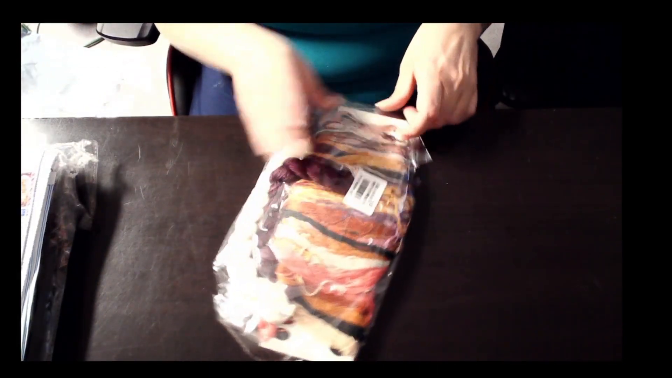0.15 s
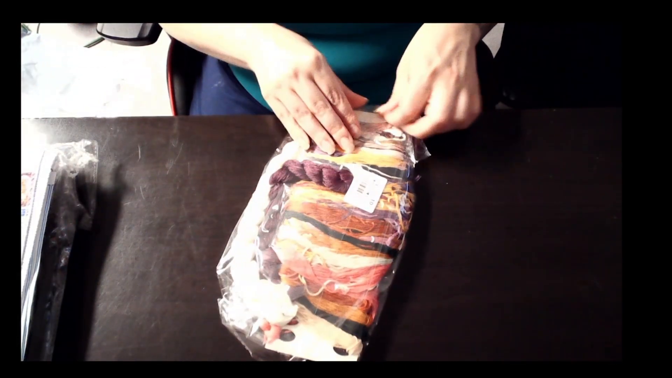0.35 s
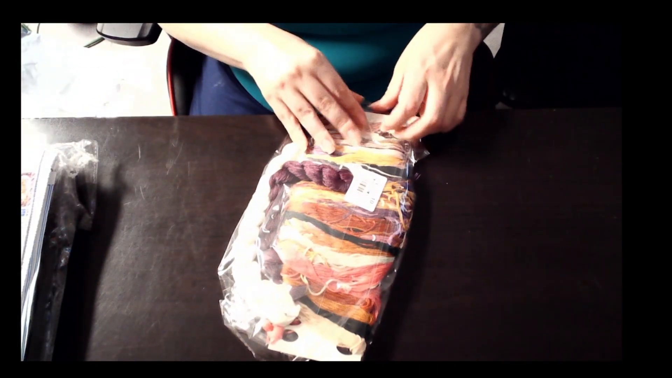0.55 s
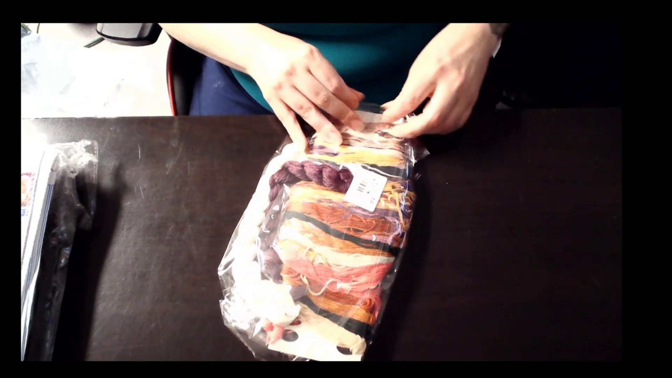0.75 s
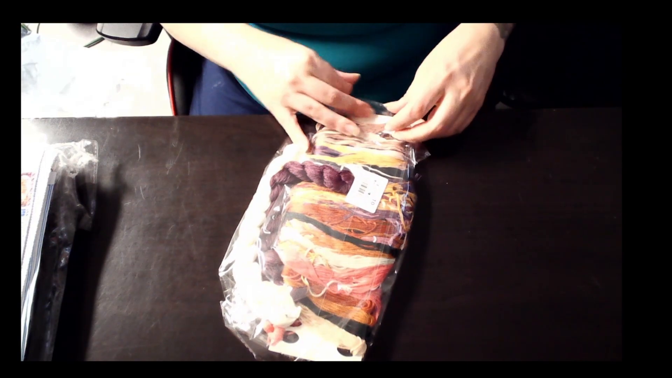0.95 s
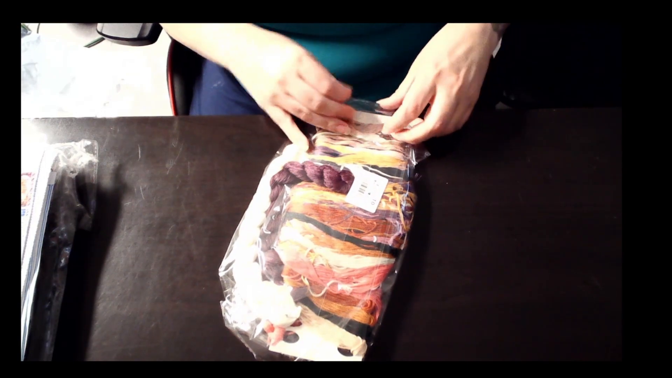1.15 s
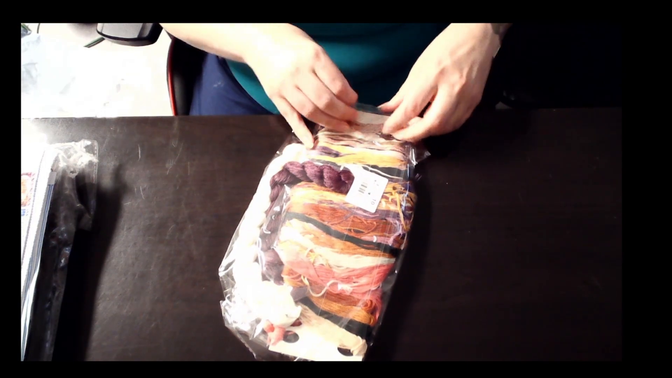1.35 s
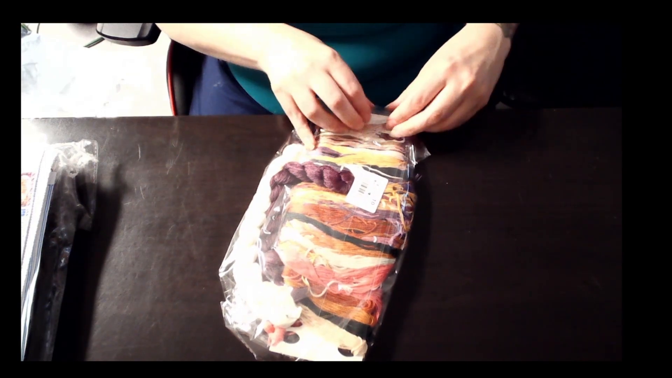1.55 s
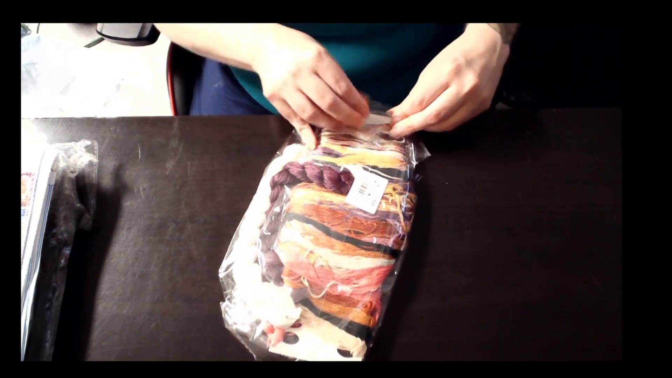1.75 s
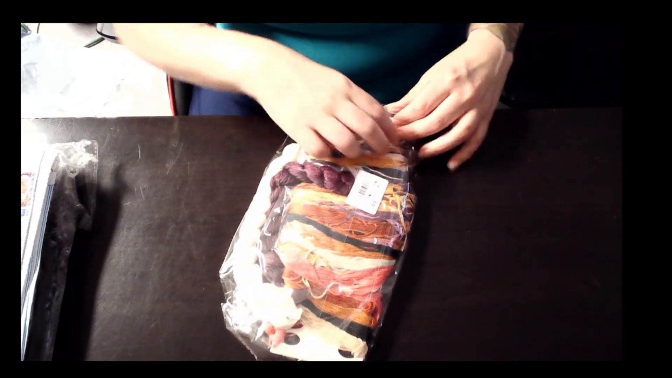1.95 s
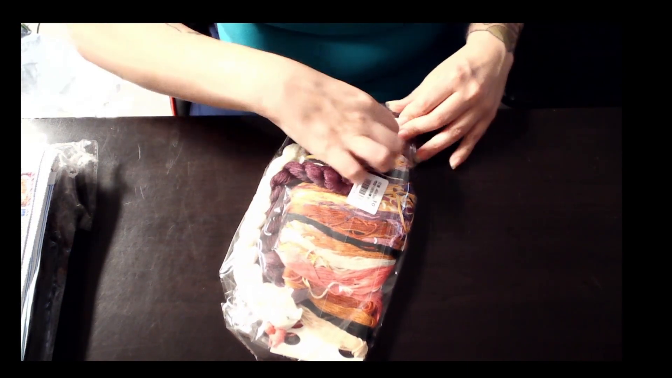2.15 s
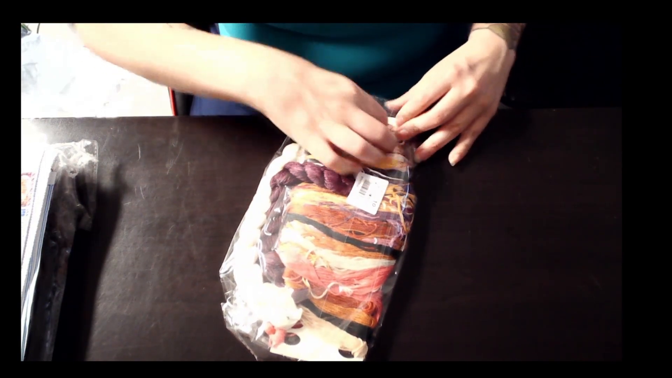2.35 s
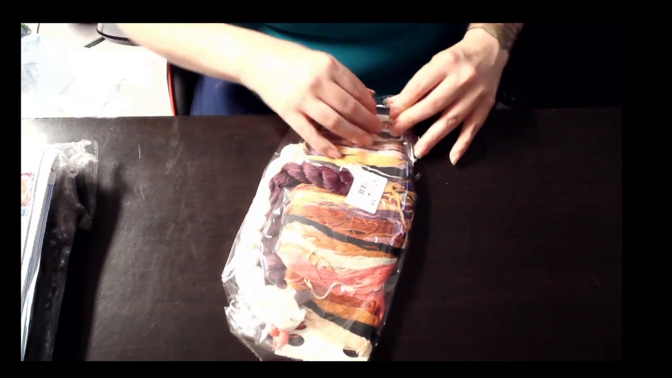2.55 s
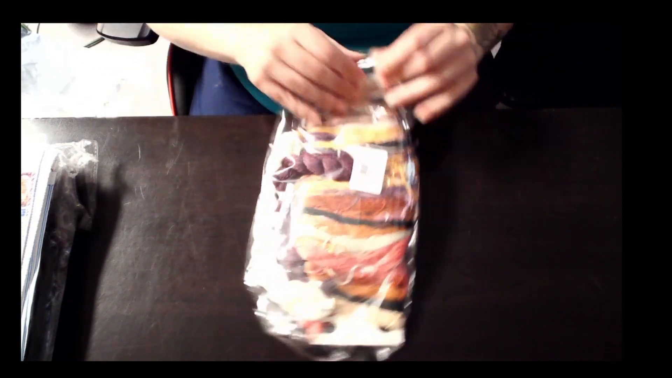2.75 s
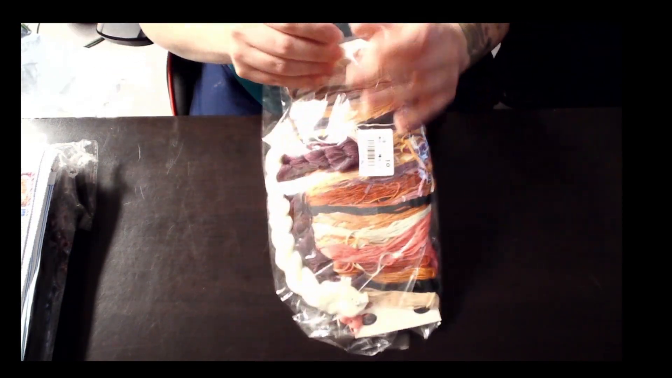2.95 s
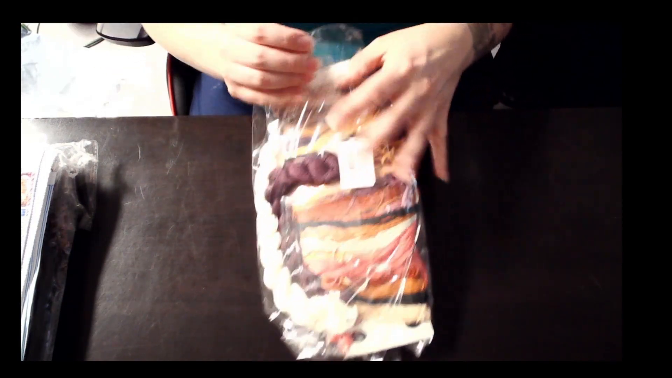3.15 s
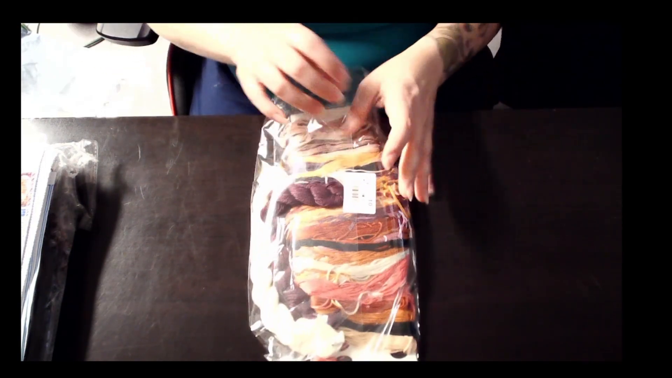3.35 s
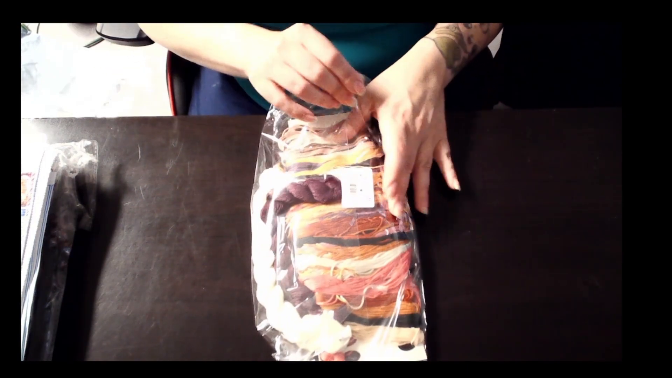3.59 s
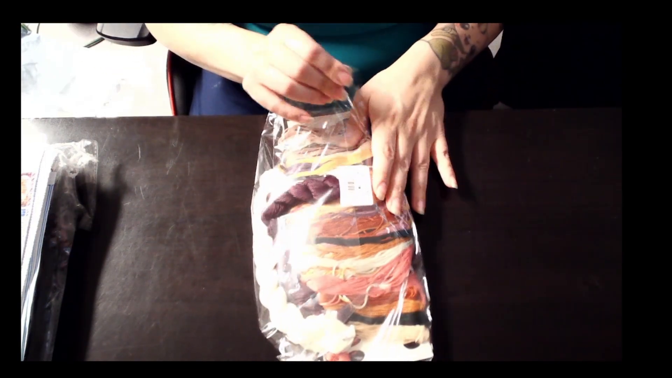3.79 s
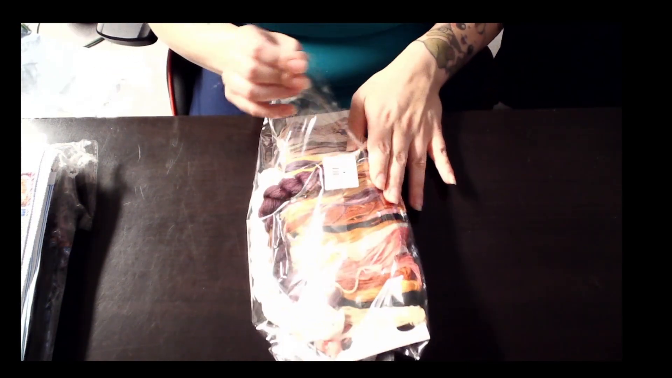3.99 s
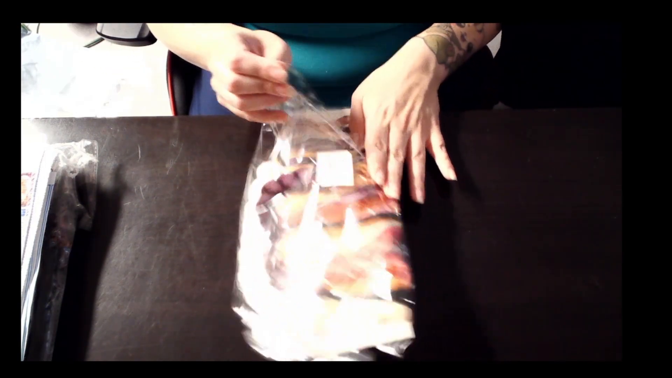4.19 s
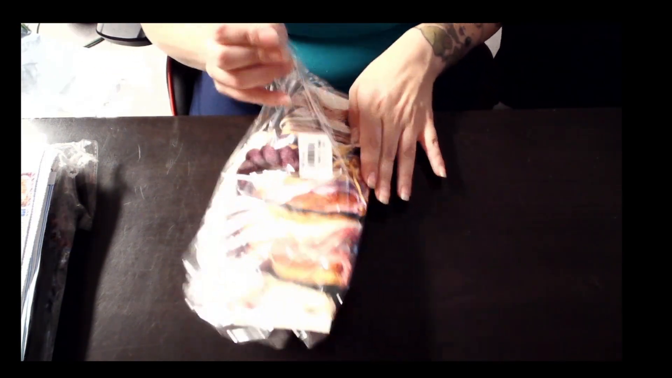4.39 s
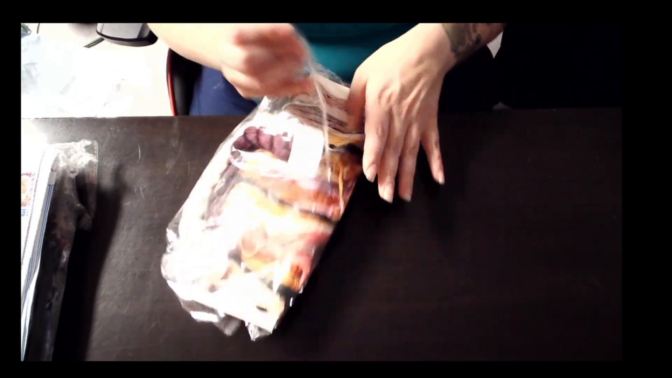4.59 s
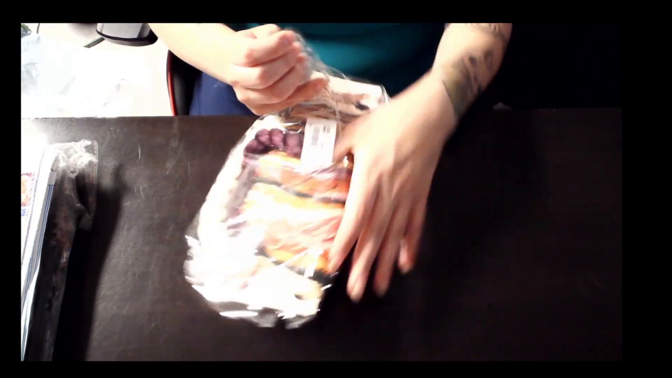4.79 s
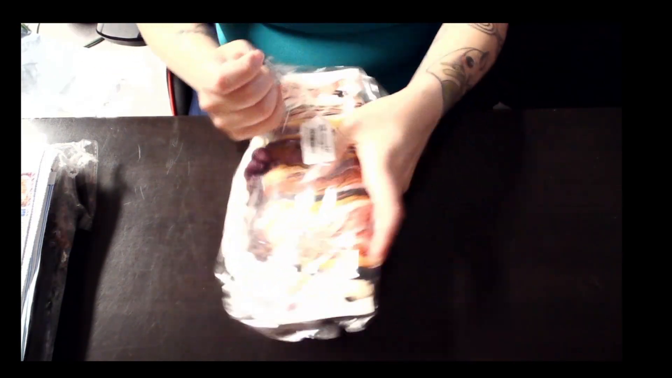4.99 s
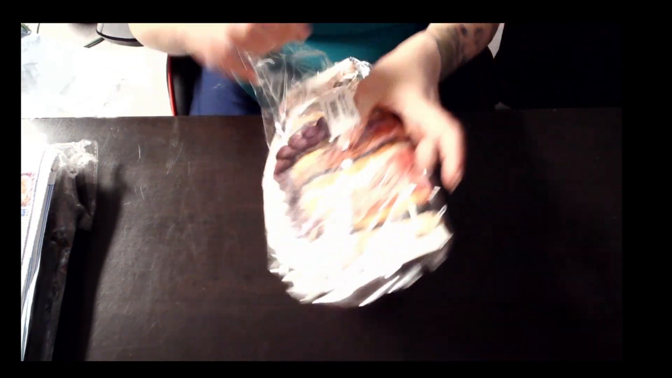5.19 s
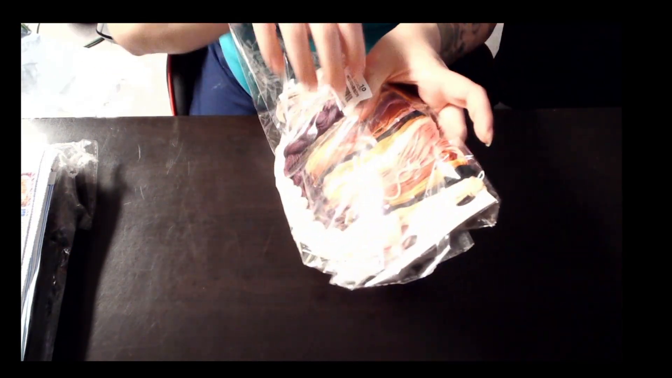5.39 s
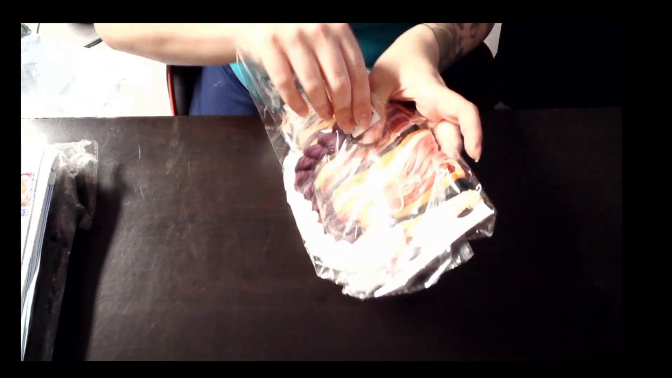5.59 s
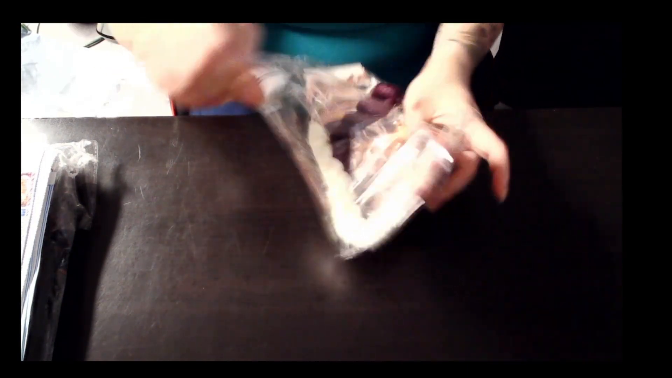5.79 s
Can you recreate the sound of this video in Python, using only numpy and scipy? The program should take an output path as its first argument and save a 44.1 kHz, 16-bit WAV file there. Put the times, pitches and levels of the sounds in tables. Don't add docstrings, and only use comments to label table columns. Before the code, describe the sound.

Thin clear plastic bag crinkles and snaps irregularly as hands knead, lift and turn it on a table, ending in a sharp loud burst.

```python
import sys
import numpy as np
from scipy import signal
from scipy.fft import rfft, irfft, next_fast_len
from scipy.io import wavfile
from scipy.ndimage import uniform_filter1d, minimum_filter1d, map_coordinates

SR = 44100
rng = np.random.default_rng(int(sys.argv[2]) if len(sys.argv) > 2 else 0)


def amp(db):
    return 10 ** (np.asarray(db, float) / 20)


def write(x):
    x = np.atleast_2d(x).T
    wavfile.write(sys.argv[1], SR, np.round(np.clip(x, -1, 1) * 32767).astype(np.int16))


N = 257367

# [f/Hz, density/dB per Hz]
AIR_COLOUR = [(15, -15.5), (60, 3), (200, -4), (500, -7), (1500, -2), (7000, -7.5)]
# [t/s, peak level/dB, crease pitch f/Hz]
CREASES = [(0.0043, -28.5, 7060), (0.0116, -34.5, 4130), (0.0308, -33.5, 6800), (0.0354, -37.5, 6720),
           (0.0619, -35.0, 5000), (0.0766, -41.0, 6370), (0.1082, -37.0, 3700), (0.1241, -37.0, 6030),
           (0.1544, -33.5, 3270), (0.2326, -46.0, 5860), (0.2395, -42.5, 6630), (0.2494, -40.5, 6200),
           (0.2607, -38.0, 3270), (0.2926, -45.0, 3530), (0.2998, -36.5, 6800), (0.3071, -41.0, 6890),
           (0.3174, -42.0, 6120), (0.3219, -41.5, 3620), (0.3382, -30.0, 3620), (0.3588, -39.5, 3010),
           (0.3662, -40.5, 6890), (0.3786, -38.0, 6370), (0.3886, -36.5, 6370), (0.399, -42.0, 5680),
           (0.4376, -33.0, 6030), (0.4707, -33.5, 6550), (0.4783, -32.0, 3360), (0.5114, -44.0, 3010),
           (0.5472, -34.0, 3360), (0.5542, -36.0, 5600), (0.5675, -42.0, 3270), (0.6077, -43.0, 5680),
           (0.6141, -33.0, 5510), (0.6879, -34.5, 6890), (0.7793, -37.0, 6030), (0.8003, -49.5, 6120),
           (0.8241, -52.0, 3190), (0.8366, -28.0, 3880), (0.8584, -36.5, 5250), (0.8722, -37.0, 6720),
           (0.8962, -35.5, 3530), (0.9394, -43.5, 5940), (0.9842, -44.5, 3620), (0.9897, -45.5, 3700),
           (0.9968, -42.5, 3270), (1.0117, -37.0, 3190), (1.0282, -44.5, 3450), (1.0329, -42.0, 3190),
           (1.0466, -40.5, 5510), (1.0792, -47.5, 6550), (1.0849, -43.0, 3530), (1.0939, -41.0, 3790),
           (1.1007, -42.5, 3100), (1.1219, -36.0, 5860), (1.1595, -39.0, 7060), (1.1984, -43.0, 4130),
           (1.216, -39.5, 3790), (1.2198, -40.5, 5860),
           (1.2282, -39.5, 5770), (1.2763, -42.0, 3450), (1.3222, -42.0, 3620), (1.3364, -40.5, 6720),
           (1.3453, -38.5, 6800), (1.4083, -37.5, 3790), (1.4121, -37.0, 6890), (1.4628, -41.0, 3700),
           (1.4815, -46.0, 3530), (1.5146, -37.0, 4740), (1.5323, -48.5, 5080), (1.5374, -41.0, 6290),
           (1.546, -40.5, 7060), (1.5833, -48.0, 3880), (1.6035, -30.5, 3700), (1.6268, -34.5, 3530),
           (1.6399, -40.5, 3620), (1.6738, -32.5, 3270), (1.6782, -36.0, 4740), (1.7022, -36.0, 4390),
           (1.7435, -49.0, 5430), (1.7529, -51.5, 4570), (1.7968, -48.0, 6290), (1.8646, -30.0, 6460),
           (1.8836, -40.0, 6550), (1.9028, -40.0, 6460), (1.9205, -43.5, 4740), (1.9902, -42.0, 3190),
           (2.0066, -41.0, 3530), (2.0183, -40.5, 3790), (2.0371, -41.5, 3270), (2.0515, -24.0, 6200),
           (2.0591, -37.5, 5680), (2.0836, -29.0, 3620), (2.11, -29.0, 4130), (2.1637, -38.0, 2840),
           (2.1801, -38.5, 3530), (2.1854, -44.5, 7060), (2.2211, -52.5, 4130), (2.2516, -44.5, 6370),
           (2.2963, -31.5, 6890), (2.3238, -34.5, 5600), (2.3782, -42.0, 6800), (2.4061, -41.0, 6720),
           (2.4329, -41.5, 6200), (2.4613, -34.5, 3960), (2.4654, -39.0, 3880), (2.4742, -40.5, 3530),
           (2.4859, -35.0, 6890), (2.5104, -36.5, 4220), (2.5196, -31.5, 3700), (2.538, -33.0, 4310),
           (2.5497, -42.5, 4570), (2.5886, -32.5, 6290), (2.6158, -43.0, 5080), (2.6461, -39.5, 6120),
           (2.6521, -36.0, 6120), (2.6721, -37.5, 6800),
           (2.7056, -31.5, 3960), (2.719, -25.5, 6550), (2.7341, -37.0, 4740), (2.746, -36.5, 6200),
           (2.7624, -34.5, 3360), (2.7835, -28.0, 6630), (2.8197, -42.0, 6720), (2.8431, -29.0, 3700),
           (2.8473, -35.0, 5250), (2.8611, -35.0, 5680), (2.8797, -28.0, 6980), (2.8841, -28.5, 3530),
           (2.8951, -32.5, 6290), (2.9072, -31.5, 5430), (2.9124, -37.5, 2410), (2.9301, -24.5, 5430),
           (2.9371, -33.5, 5080), (2.951, -20.0, 6980), (2.9622, -29.5, 5170), (2.9903, -28.0, 5250),
           (2.9953, -31.0, 4910), (3.0114, -26.5, 5250), (3.0183, -29.5, 6980), (3.0402, -32.0, 5000),
           (3.0553, -33.5, 6290), (3.096, -36.0, 6200), (3.1132, -40.5, 6980), (3.1328, -36.0, 7150),
           (3.1419, -38.5, 5680), (3.1697, -33.5, 6720), (3.1758, -39.5, 5170), (3.1869, -37.5, 6980),
           (3.1925, -38.5, 5940), (3.2081, -42.0, 6200), (3.2502, -38.0, 3960), (3.2948, -42.5, 3190),
           (3.3209, -37.5, 5250), (3.3252, -42.0, 5600), (3.3337, -41.0, 2930), (3.3429, -36.5, 4910),
           (3.3495, -37.5, 2930), (3.3624, -40.5, 5080), (3.3667, -34.5, 6800), (3.4519, -41.5, 2930),
           (3.4932, -44.5, 3360), (3.5047, -34.0, 6630), (3.512, -38.0, 3360), (3.5325, -38.5, 3790),
           (3.5693, -44.0, 4390), (3.579, -36.0, 3360), (3.5866, -40.5, 5080), (3.6022, -39.5, 3700),
           (3.6244, -37.0, 3450), (3.6592, -36.5, 6890), (3.676, -38.5, 3450), (3.6904, -36.0, 3530),
           (3.742, -38.0, 3100), (3.7511, -40.0, 3270),
           (3.7555, -37.0, 3190), (3.7747, -38.0, 3620), (3.7989, -50.0, 5680), (3.8242, -29.5, 6120),
           (3.8301, -32.5, 6630), (3.8727, -27.0, 5080), (3.9046, -36.5, 3190), (3.9099, -37.0, 6460),
           (3.9178, -39.5, 6800), (3.9229, -40.0, 6550), (3.9354, -42.0, 6720), (3.9586, -33.0, 6720),
           (3.9797, -40.0, 6800), (3.9838, -37.0, 6720), (4.0102, -26.5, 3360), (4.076, -34.0, 6200),
           (4.093, -41.5, 6980), (4.1247, -27.5, 5860), (4.132, -39.5, 6030), (4.1398, -39.5, 6800),
           (4.1596, -42.0, 7060), (4.1716, -40.0, 6370), (4.1903, -41.5, 5340), (4.2073, -40.0, 2670),
           (4.2291, -29.5, 5600), (4.2357, -28.0, 4910), (4.2445, -20.5, 6800), (4.2549, -24.0, 6980),
           (4.269, -19.0, 6200), (4.2786, -22.0, 6120), (4.3063, -28.5, 4650), (4.329, -24.0, 6980),
           (4.3452, -27.5, 5080), (4.3504, -21.5, 6890), (4.3568, -25.0, 6550), (4.3771, -31.0, 6550),
           (4.3808, -34.0, 6890), (4.4019, -24.5, 6800), (4.4153, -36.0, 6800), (4.4306, -23.5, 6120),
           (4.437, -33.5, 5680), (4.4564, -35.0, 5000), (4.4752, -34.5, 5170), (4.4958, -28.5, 5340),
           (4.5005, -36.0, 6120), (4.5308, -34.0, 5770), (4.5402, -28.5, 6980), (4.5561, -38.5, 6370),
           (4.5714, -28.5, 4910), (4.5832, -31.5, 5600), (4.5931, -31.0, 5940), (4.6039, -26.0, 5430),
           (4.6082, -24.0, 6980), (4.6153, -19.0, 6980), (4.6329, -28.5, 4740), (4.6445, -37.5, 4740),
           (4.6854, -30.5, 6720), (4.7378, -40.5, 5340),
           (4.7482, -22.5, 5000), (4.7596, -33.0, 6980), (4.7705, -35.0, 5600), (4.8016, -28.5, 3530),
           (4.8095, -25.5, 3620), (4.8292, -32.5, 3190), (4.8559, -29.5, 7060), (4.88, -28.5, 4650),
           (4.8897, -23.5, 6890), (4.9091, -38.0, 5000), (4.9351, -25.5, 6030), (4.95, -32.5, 6980),
           (4.9576, -29.5, 6890), (4.9619, -34.5, 3360), (4.9857, -25.5, 5170), (4.9954, -26.0, 5000),
           (5.012, -32.0, 6890), (5.0282, -27.0, 5860), (5.0477, -34.0, 5510), (5.0577, -31.5, 4740),
           (5.0624, -29.5, 6030), (5.0829, -39.0, 6890), (5.1067, -39.0, 5430), (5.1178, -34.5, 5080),
           (5.1427, -30.5, 6720), (5.1471, -23.5, 6890), (5.1566, -28.5, 5510), (5.1637, -33.5, 6030),
           (5.1735, -34.0, 6550), (5.239, -42.0, 4570), (5.243, -46.5, 5770), (5.2601, -38.5, 3620),
           (5.2746, -34.5, 4740), (5.3543, -48.0, 6550), (5.3607, -31.0, 6800), (5.377, -36.0, 3790),
           (5.4041, -37.0, 6800), (5.4406, -43.0, 6200), (5.4563, -33.0, 5430), (5.5155, -38.5, 6800),
           (5.5732, -39.0, 2500), (5.603, -32.0, 7060), (5.6107, -35.5, 5170), (5.6438, -27.5, 3100),
           (5.6577, -26.5, 6800), (5.6799, -24.5, 6550), (5.6848, -17.5, 6720), (5.6903, -13.0, 6800),
           (5.6963, -13.5, 6890), (5.7007, -15.0, 6800), (5.706, -12.5, 6550), (5.7312, -21.0, 3620),
           (5.7419, -17.0, 5940), (5.7527, -20.5, 3270), (5.7692, -23.0, 4650), (5.8034, -26.0, 6980),
           (5.8089, -29.0, 6120), (5.8185, -30.5, 3450)]
# [t/s, peak level/dB]
STRAYS = [(.1796, -44), (1.326, -46), (1.6001, -39), (2.0104, -44), (2.4584, -41), (2.6939, -38),
          (2.6983, -35), (2.7581, -33), (2.7752, -35), (2.8351, -39), (3.024, -32), (3.044, -32),
          (3.7014, -37), (3.8692, -29), (4.2634, -27), (4.2754, -26), (4.4495, -35), (4.498, -29),
          (4.5961, -31)]
# [peak t/s, rustle level/dB, rise/s, fall/s]
SQUEEZES = [(0.0, -51, .1, .22), (.34, -54, .15, .08), (0.52, -62, .15, .2), (0.844, -56, .015, .2),
            (0.92, -61, 0.11, .07), (1.12, -60.5, .25, .16), (1.328, -65, .02, .12), (1.499, -65, .15, .35),
            (1.89, -57, .04, .08), (2.06, -60, .11, .16), (2.169, -63, .1, .04), (2.307, -58, .07, .17),
            (2.54, -61.5, .13, .2), (2.721, -49, .18, .22), (2.99, -45, .14, .135), (3.24, -56, .12, .085),
            (3.368, -59.5, .15, .2), (3.51, -59, .05, .12), (3.681, -58, .3, .2), (3.836, -49, .02, .2),
            (4.02, -57.5, .2, .045), (4.28, -45, .11, .28), (4.62, -49, .11, .07), (4.768, -50.5, .05, .32),
            (5.02, -46, .09, .15), (5.17, -51.5, .14, .09), (5.27, -62.5, .2, .02), (5.38, -57.5, .03, .1),
            (5.65, -48, .13, 0.12), (5.7, -34, .035, .2)]
# [f/Hz, density/dB per Hz]
FILM_COLOUR = [(900, -54.5), (1800, -26), (2600, -8.5), (3500, -5), (5700, -1.5), (6900, 1), (7700, 0.5),
               (8700, -29)]
# [f/Hz, density/dB per Hz]
BAG_AIR_COLOUR = [(150, -33), (400, -16), (800, -15), (1400, -4), (2300, 1), (3500, -14.5)]
# [t/s, boom level/dB against the rustle]
FULLNESS = [(0, -19), (.9, -26.5), (1.05, -21.5), (1.5, -28), (2.2, -27.5), (2.7, -19), (3.4, -14),
            (3.7, -6.5), (4.1, -22.5), (4.3, -14.5), (4.9, -20.5), (5.4, -19), (5.6, -10), (5.72, -11),
            (5.84, -16)]
# [f/Hz, t60/s]
ROOM_DECAY = [(500, 0.13), (7000, 0.19)]
# [t/s, level/dB, pitch f/Hz]
POCKETS = [(0.261, -62.5, 1190), (0.479, -61.5, 1200), (0.495, -64, 1460), (0.688, -60, 1570),
           (0.91, -59.5, 1640), (1.013, -59, 2130), (1.033, -55.5, 1330), (1.053, -60, 1270),
           (1.12, -55.5, 1590), (1.222, -73, 1630), (1.277, -71, 2220), (1.41, -64, 1400),
           (1.675, -63.5, 1480), (1.932, -62.5, 2070), (2.048, -60, 1376), (2.11, -61, 1480),
           (2.163, -62, 1630), (2.408, -65, 1470), (2.511, -57.5, 2070), (2.528, -63, 2200),
           (2.707, -49, 1050), (2.836, -59, 1880), (2.884, -46, 640), (2.911, -51, 1900),
           (2.951, -43.5, 2050), (3.051, -50.5, 1940), (3.167, -54, 2020), (3.506, -56, 1400),
           (3.523, -58, 1590), (3.595, -53, 1370), (3.695, -50, 1420), (3.758, -57, 1500),
           (3.833, -45, 970), (4.007, -56.5, 2320), (4.258, -49.5, 1230), (4.289, -39.5, 540),
           (4.346, -58, 1980), (4.432, -60, 2180), (4.497, -58, 1700), (4.608, -41.5, 2380),
           (4.799, -44, 2230), (4.902, -55, 1900), (4.996, -46, 825), (5.062, -48.5, 2210),
           (5.148, -43.5, 2300), (5.26, -62, 2170), (5.274, -77, 2090), (5.362, -52.5, 520),
           (5.377, -52.5, 840), (5.456, -59.5, 2040), (5.574, -46, 562), (5.692, -40, 2200),
           (5.741, -52, 2110)]
# [middle t/s, first mode level/dB, second mode level/dB, thud level/dB, half length/s]
SLIDES = [(0.456, -82, -100, -105, 0.037), (0.687, -81.5, -110, -97, 0.038),
          (0.892, -86, -110, -110, 0.076), (1.106, -76.5, -110, -104, 0.051), (1.491, -76, -91, -89, 0.022),
          (1.967, -92, -110, -93, 0.048), (2.206, -76, -108, -89, 0.075), (2.296, -93, -104, -97, 0.062),
          (2.48, -89.5, -108, -102, 0.19), (2.825, -100, -78.5, -106, 0.2), (2.943, -65.5, -87, -89, 0.16),
          (3.274, -78, -100, -82.5, 0.08), (3.63, -77, -99, -84, 0.023), (3.696, -79.5, -104, -100, 0.063),
          (3.936, -107, -112, -99, 0.12), (4.32, -80.5, -93, -85, 0.11), (4.627, -97, -76.5, -99, 0.059),
          (4.733, -69.5, -104, -85, 0.15), (4.992, -68, -90, -88, 0.042), (5.085, -72.5, -73, -80.5, 0.12),
          (5.244, -74, -80, -102, 0.021), (5.363, -82, -86, -81.5, 0.03), (5.595, -80.5, -85, -86.5, 0.2),
          (5.719, -88, -61.5, -76.5, 0.073)]
# [f/Hz, width/Hz]
TABLE_MODES = [
    (197, 29),
    (632, 75),
]
# [f/Hz, density/dB per Hz]
THUD_COLOUR = [(15, -48), (45, -10.5), (100, -5.5), (260, -5), (400, -32), (800, -100)]
# [t/s, level/dB]
SLIPS = [
    (2.9976, -73),
    (3.227, -75),
    (4.2616, -71),
    (4.3363, -83),
    (4.6244, -73),
    (4.875, -71),
    (5.283, -82),
    (5.6056, -84),
]
# [f/Hz, density/dB per Hz]
SLIP_COLOUR = [(5000, -60), (8500, -8), (10000, 0), (15500, -16)]
# [f/Hz, gain/dB]
BAND_EDGE = [(6900, 3), (7350, 1), (7750, -22.5), (8000, -37), (8400, -67)]
# [f/Hz, gain/dB]
IMAGE_BAND = [(7800, -51), (8000, 16.5), (8500, -16), (8900, -28), (9250, -43), (9900, -97)]

STILL_DB = -108


def unit(x):
    return x / np.sqrt(np.mean(x ** 2) + 1e-20)


def along(points, hz):
    f, value = np.transpose(points)
    return np.interp(np.log(hz + 1), np.log(f + 1), value)


def wobble(rate):
    knots = rng.standard_normal(int(N * rate / SR) + 4)
    return map_coordinates(knots, [np.arange(N) * rate / SR])


def filtered(x, response):
    m = next_fast_len(N + SR // 2)
    hz = np.fft.rfftfreq(m, 1 / SR)
    return irfft(rfft(x, m) * response(hz), m)[..., :N]


def coloured(x, points):
    return filtered(x, lambda hz: amp(along(points, hz)))


def swells(s, db, rise_s, fall_s, rest_db, shape):
    since = np.arange(0, N, 32)[:, None] / SR - s
    away = np.maximum(-since / np.abs(rise_s), since / np.abs(fall_s))
    power = amp(2 * (db - 20 * away ** shape)).sum(1)
    level_db = 10 * np.log10(power + amp(2 * rest_db))
    return np.repeat(level_db, repeats=32)[:N]


def cracks(spectrum, pitch_hz, t60, spread, peak_db, size=512):
    t, hz = np.arange(size) / SR, np.fft.rfftfreq(size, 1 / SR)
    shape = t / t60[:, None] * amp(-60 * t / t60[:, None])
    distance = np.log((hz + 1) / pitch_hz[:, None]) / spread
    lift = peak_db * np.exp(-.5 * distance ** 2)
    noise = rng.standard_normal(shape.shape) * shape
    burst = irfft(rfft(noise) * amp(along(spectrum, hz) + lift), size)
    return burst / np.abs(burst).max(1, keepdims=True)


def placed(s, bursts):
    size = bursts.shape[1]
    since = (np.arange(size) + size // 4) % size - size // 4
    peak = np.abs(bursts).argmax(1)[:, None] % size
    at = np.round(s * SR).astype(int)[:, None] - peak + since
    return np.bincount(np.clip(at, 0, N).ravel(), bursts.ravel(), N + 1)[:N]


def still_air():
    return amp(-86.5) * unit(coloured(rng.standard_normal(N), AIR_COLOUR))


def creases():
    stray = np.c_[STRAYS, 3000 * 2.3 ** rng.random(len(STRAYS))]
    return np.concatenate([CREASES, stray]).T


def effort(s, db):
    squeeze_db = swells(*np.transpose(SQUEEZES), rest_db=-86, shape=1.3)
    after_db = swells(s, db - 19, 1 / SR, .02, STILL_DB, shape=1)
    return 10 * np.log10(amp(2 * (squeeze_db - 1)) + amp(2 * after_db))


def snaps(s, db, pitch_hz):
    hard = np.maximum(db + 19, 0)
    t60 = .002 * amp(1.5 * rng.standard_normal(len(s)) + hard)
    bursts = cracks(FILM_COLOUR, pitch_hz, t60, spread=0.14, peak_db=12 + 0.56 * hard[:, None])
    return placed(s, amp(db - 2)[:, None] * bursts)


def grains(effort_db, count=4200):
    density = amp(.4 * effort_db)
    when, pitch, rank = rng.random((count, 3)).T
    s = np.interp(when, np.cumsum(density) / density.sum(), np.arange(N) / SR)
    t60 = np.full(count, .0028)
    bursts = cracks(FILM_COLOUR, 2500 * 3 ** pitch, t60, spread=.18, peak_db=14, size=256)
    sizes = amp(-3 * np.log(rank + .05))
    clumps = amp(2.2 * wobble(45))
    rustle = clumps * placed(s, sizes[:, None] * bursts) / np.sqrt(density)
    return amp(effort_db - 2.5) * unit(rustle)


def hollow(film, effort_db):
    quick, slow = uniform_filter1d(film ** 2, size=150), uniform_filter1d(film ** 2, size=4000)
    jolts = np.abs(quick / (np.abs(slow) + 1e-12)) ** 0.087
    z = signal.stft(jolts * rng.standard_normal(N), nperseg=512)[2]
    field = uniform_filter1d(rng.standard_normal(z.shape), size=4, axis=0)
    field = uniform_filter1d(field, size=8, axis=1)
    patchy = signal.istft(z * amp(3.37 * unit(field)), nperseg=512)[1][:N]
    boom_db = np.interp(np.arange(N) / SR, *np.transpose(FULLNESS))
    return amp(effort_db + boom_db) * unit(coloured(patchy, BAG_AIR_COLOUR))


def room(x, count=40):
    wet, step = np.zeros(N + SR), N // count + 1
    for k in range(count):
        hz, t, z = signal.stft(rng.standard_normal(SR // 4), SR, nperseg=128)
        decay = amp(-60 * t / along(ROOM_DECAY, hz)[:, None])
        tail = signal.istft(z * decay, SR, nperseg=128)[1]
        echo = signal.fftconvolve(x[k * step:(k + 1) * step], tail / np.linalg.norm(tail))
        wet[k * step + 60:][:len(echo)] += echo
    return wet[:N]


def pockets():
    s, db, pitch_hz = np.transpose(POCKETS)
    t60 = np.full(len(s), 0.015)
    bursts = cracks(BAG_AIR_COLOUR, pitch_hz, t60, spread=0.14, peak_db=14.5, size=1024)
    return placed(s, amp(db + 1.0)[:, None] * bursts)


def table():
    s, *peak_db, half_s = np.transpose(SLIDES)
    *mode_db, thud_db = [swells(s, db, half_s, half_s, STILL_DB, shape=2.73) for db in peak_db]
    thud = amp(6.5 * wobble(35)) * coloured(rng.standard_normal(N), THUD_COLOUR)
    hum = amp(thud_db + 8.0) * unit(thud)
    for db, (c, w) in zip(mode_db, TABLE_MODES):
        rub = amp(5 * wobble(30)) * rng.standard_normal(N)
        mode = filtered(rub, lambda f: (1j * f * w / (c * c - f * f + 1j * f * w)) ** 2)
        hum = hum + amp(db - 2.5) * unit(mode)
    return hum


def slips():
    s, db = np.transpose(SLIPS)
    chance = rng.standard_normal(N)
    rare = chance * (np.abs(chance) > 3.1)
    sparkle = amp(swells(s, db + 4, .15, .15, -74, shape=1)) * rare
    ticks = np.bincount(np.round(s * SR).astype(int), amp(db + 29), N)
    return coloured(ticks + sparkle, SLIP_COLOUR)


def scene():
    s, db, pitch_hz = creases()
    effort_db = effort(s, db)
    film = snaps(s, db, pitch_hz) + grains(effort_db)
    bag = film + hollow(film, effort_db) + pockets()
    air = still_air()
    return (bag + amp(-12) * room(bag) + table() + air)[None]


def roll_off(x):
    return signal.sosfilt(signal.butter(12, 15700, fs=SR, output="sos"), x)


def record(dry):
    ceiling, inner_hz = .23, 16000
    narrow = coloured(dry, BAND_EDGE)
    needed = ceiling / np.maximum(np.abs(narrow), ceiling)
    narrow = narrow * uniform_filter1d(minimum_filter1d(needed, size=180), size=90)
    carrier = 2 * np.cos(2 * np.pi * inner_hz * np.arange(N) / SR)
    mirror = coloured(narrow * carrier, IMAGE_BAND)
    converter_noise = slips() + amp(-99) * rng.standard_normal(dry.shape)
    return roll_off(narrow + mirror + converter_noise)


dry = scene()
out = record(dry)
write(out)
```